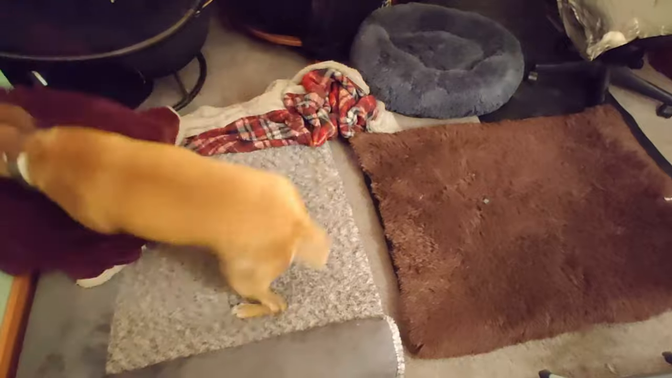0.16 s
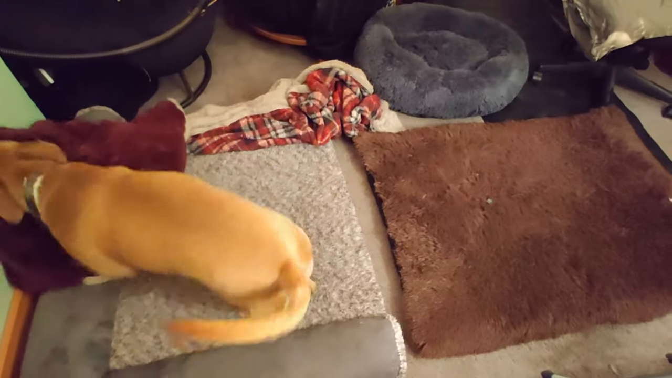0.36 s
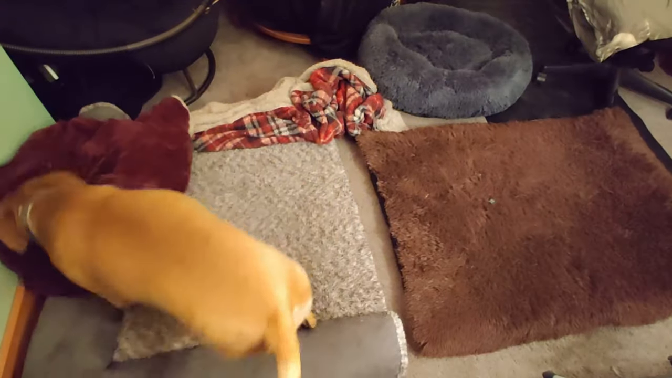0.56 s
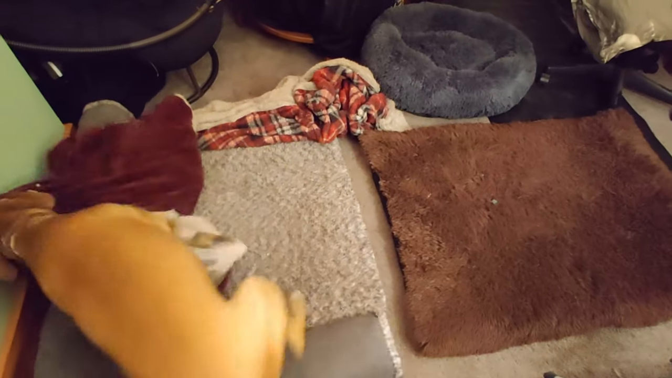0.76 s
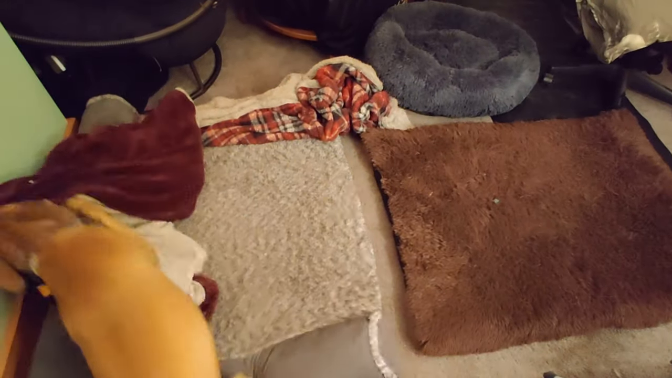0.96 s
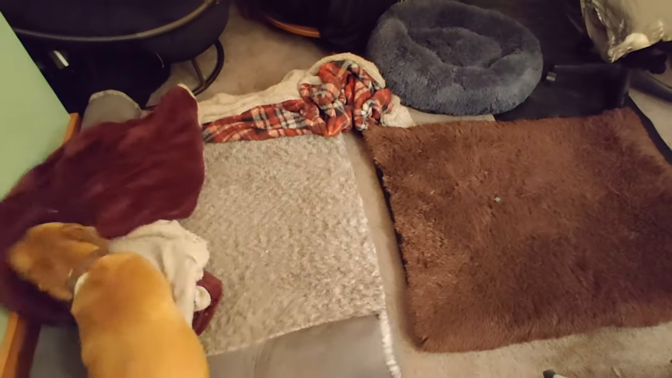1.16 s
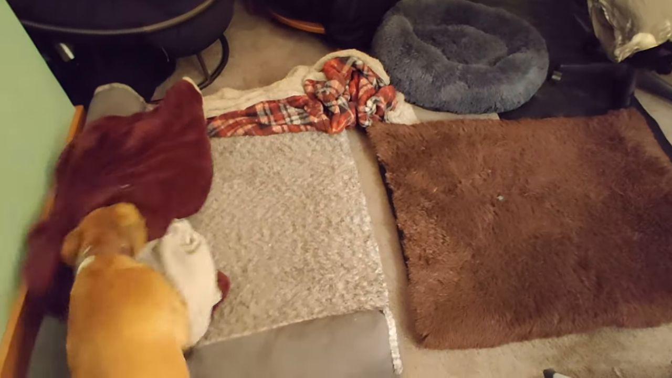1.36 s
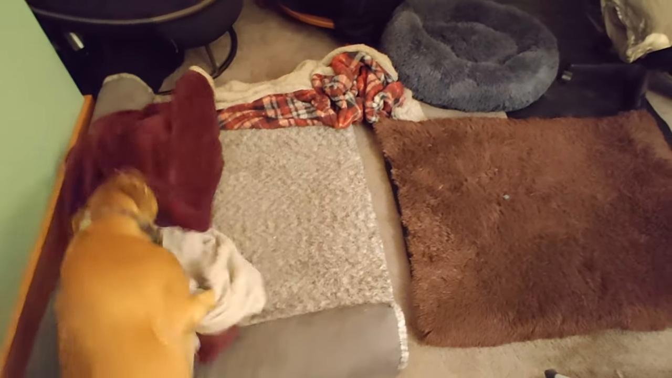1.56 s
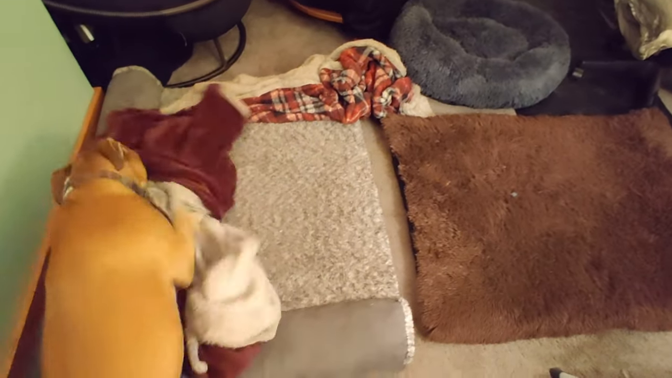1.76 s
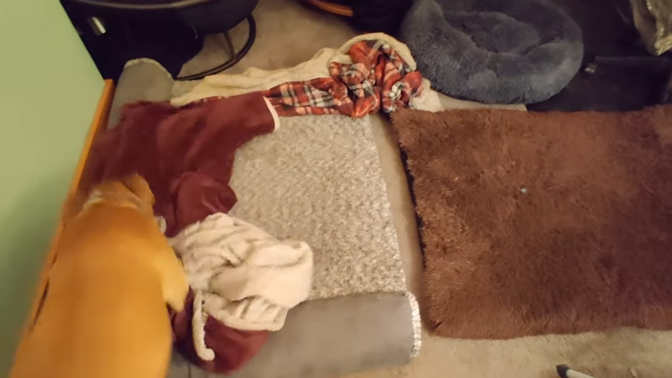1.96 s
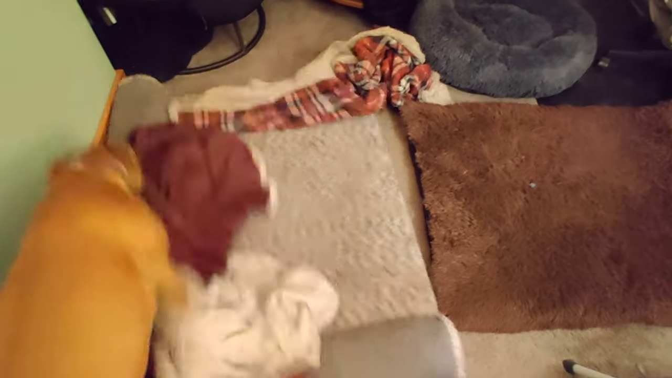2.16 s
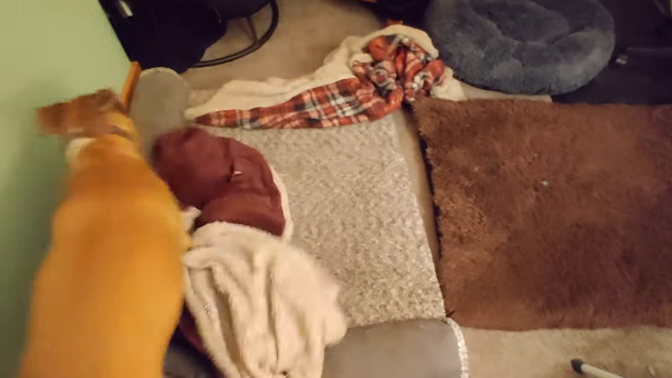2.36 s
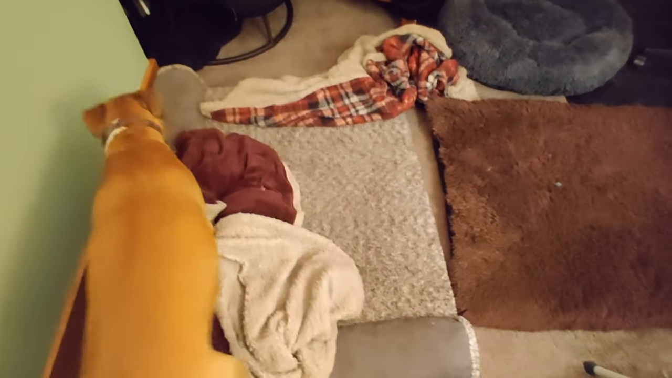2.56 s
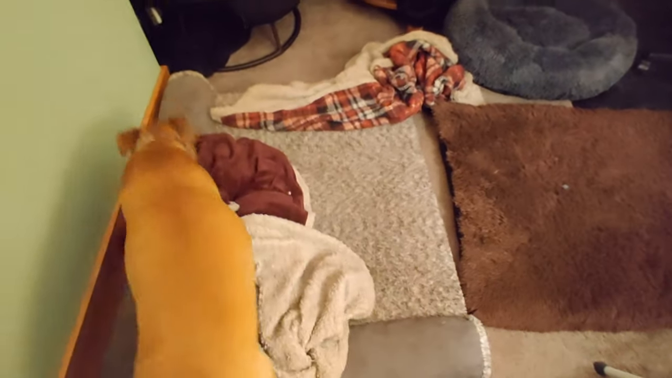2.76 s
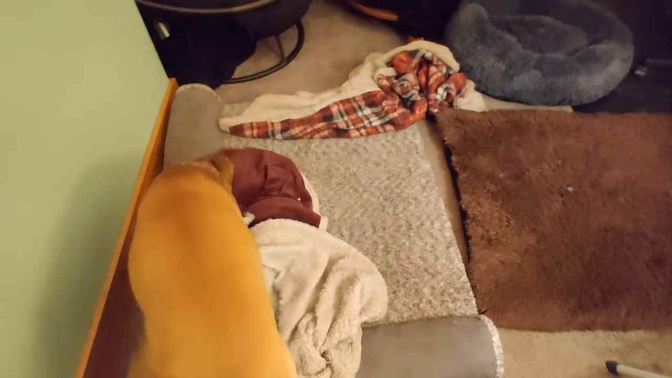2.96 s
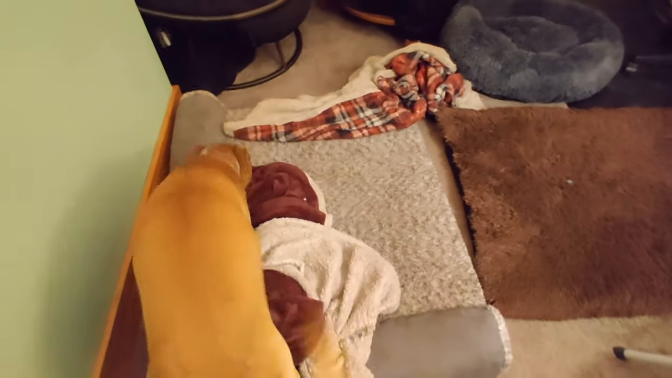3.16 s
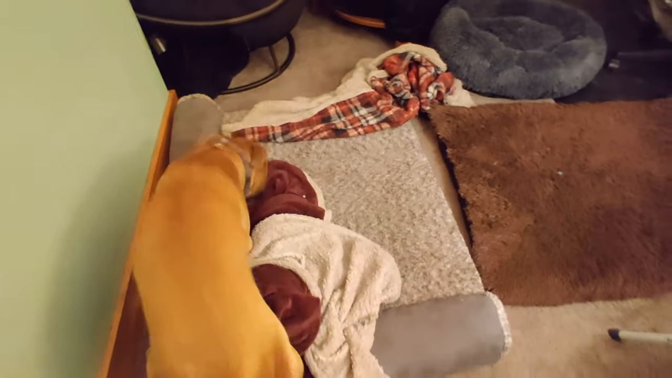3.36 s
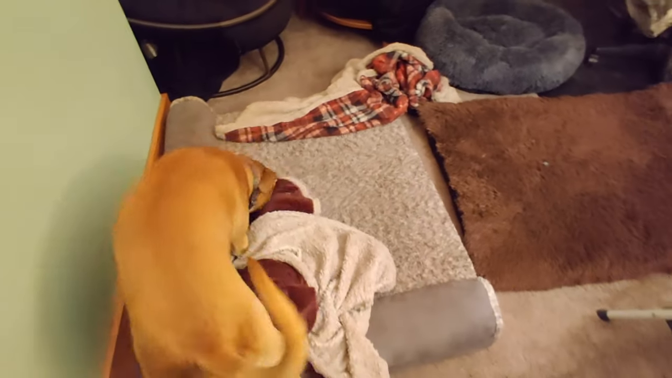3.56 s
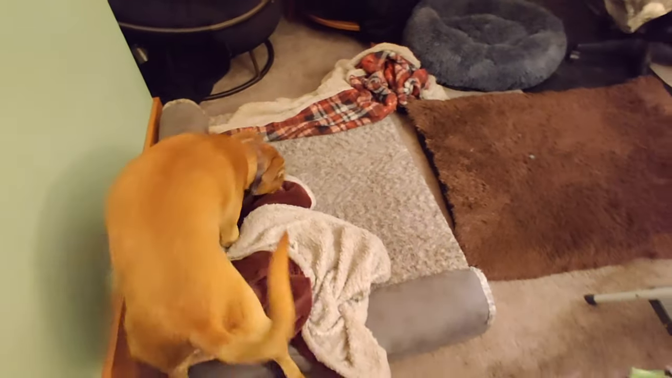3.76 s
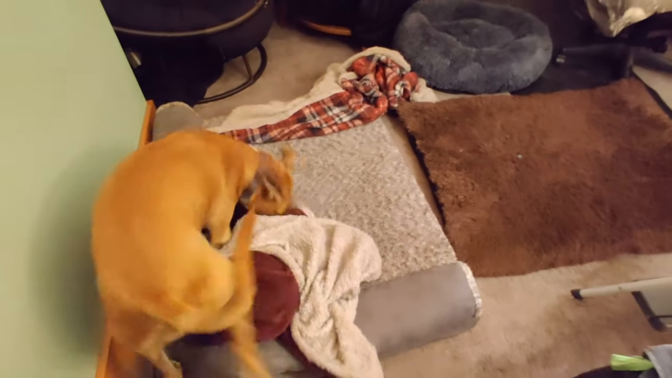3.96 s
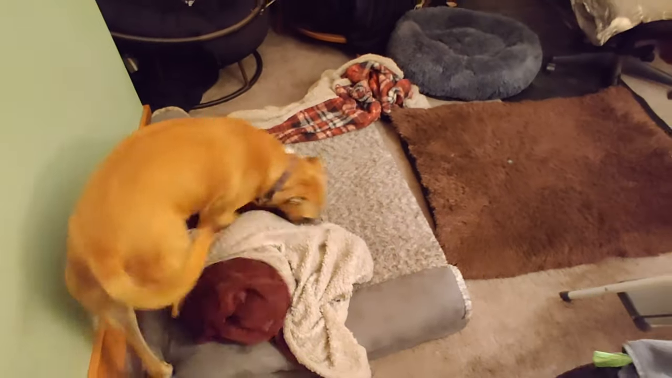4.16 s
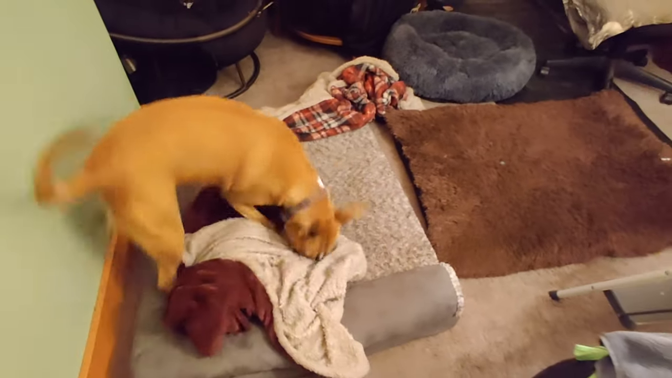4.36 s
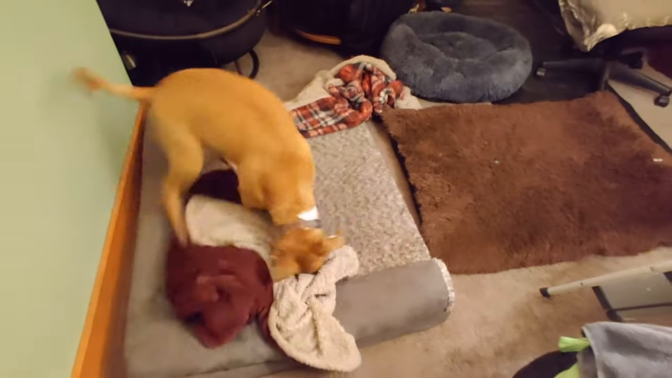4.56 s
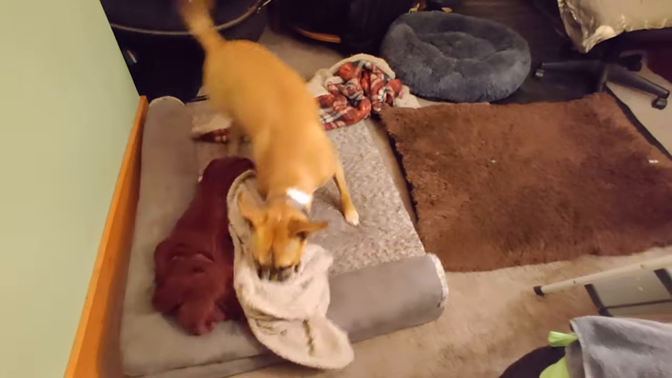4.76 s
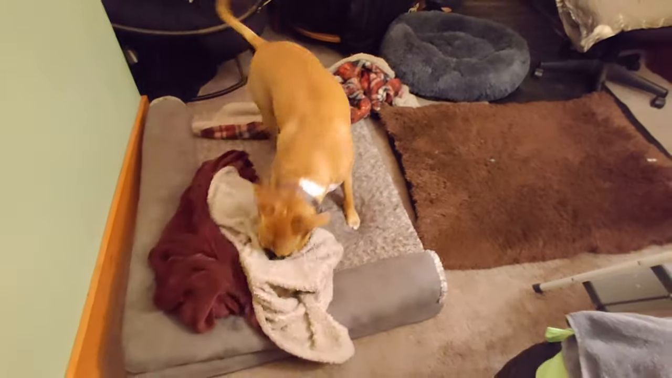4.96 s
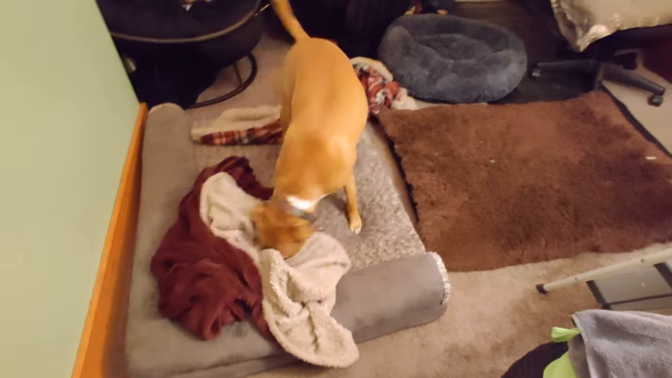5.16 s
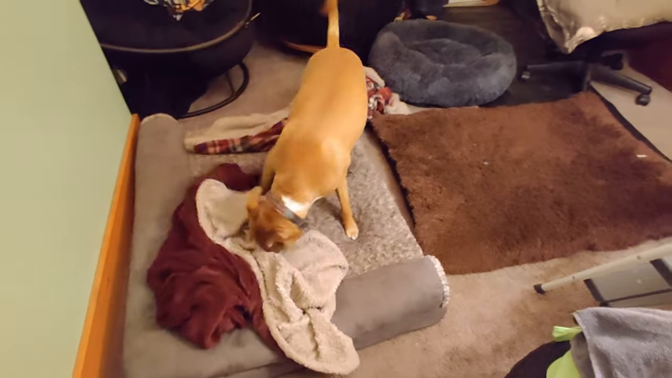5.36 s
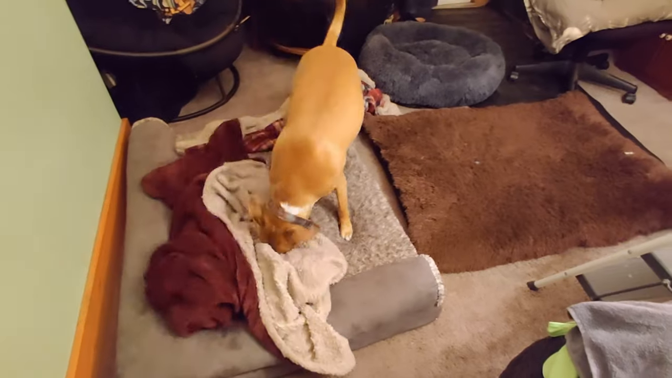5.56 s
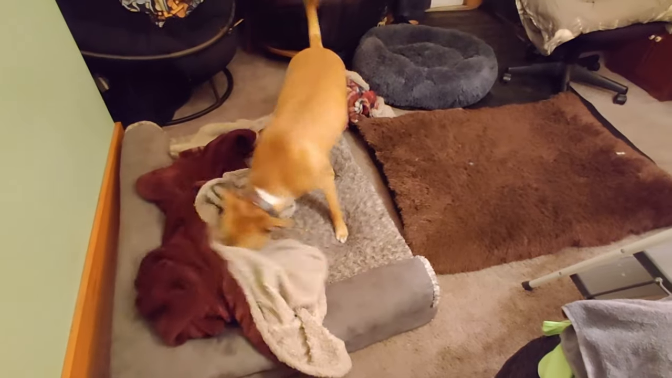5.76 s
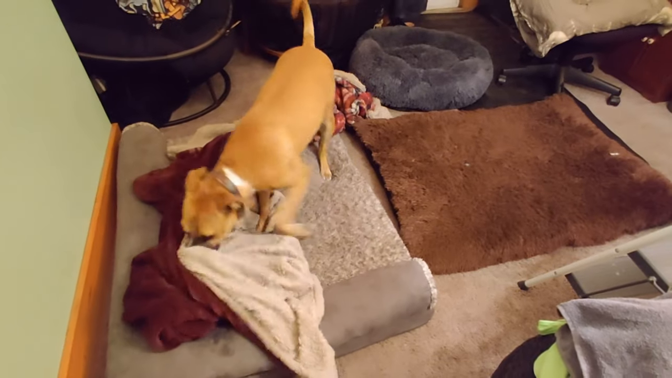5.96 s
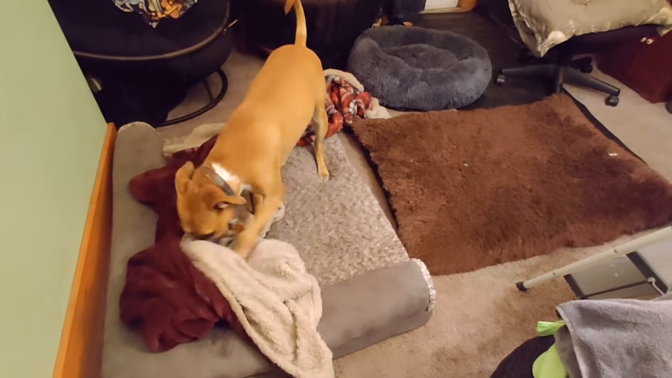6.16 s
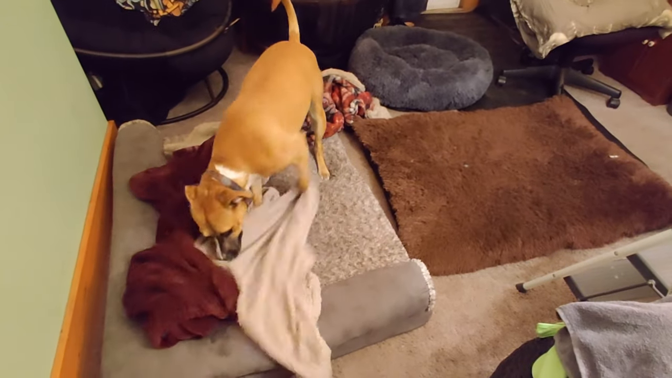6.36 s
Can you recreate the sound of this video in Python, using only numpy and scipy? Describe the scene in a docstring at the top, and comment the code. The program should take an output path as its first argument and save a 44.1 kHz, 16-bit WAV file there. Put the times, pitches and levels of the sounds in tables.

```python
"""Rustling, thuds and jingling tags: a dog roots through blankets on a cushion in a small carpeted room.
Coat and fleece rub and scuff amid short ticks, paws thud, and its body bumps a wooden rail by the wall.
Metal collar tags chatter and ring as it turns; once it snorts into the blanket.
Faint room air and mains hum lie below."""
import sys
import numpy as np
from scipy import signal
from scipy.fft import rfft, irfft, next_fast_len
from scipy.io import wavfile
from scipy.ndimage import uniform_filter1d

SR = 44100
rng = np.random.default_rng(int(sys.argv[2]) if len(sys.argv) > 2 else 0)


def store_wav(level_fs):
    """Save 16-bit WAV to argv[1]."""
    pcm = np.round(np.clip(np.atleast_2d(level_fs), -1, 1) * 32767)
    wavfile.write(sys.argv[1], SR, pcm.T.astype(np.int16))


N = 282365
TIME = np.arange(N) / SR


def rubbing(cloth, cushion_db=-3, lumpy_db=2.5, attack_s=0.0098, release_s=0.038):
    """Each shove rumbles the cushion under the dog's weight and swishes the fleece over it."""
    # (time [s], length [s], relative weight on cushion [dB], swish [dB])
    shoves = [(0.225, 0.13, -52.5, -62.5), (0.618, 0.024, -44.5, -54.5), (0.698, 0.1, -49.5, -57),
              (0.859, 0.02, -30, -42.5), (0.997, 0.11, -38.5, -48.5), (1.096, 0.069, -44.5, -44),
              (1.161, 0.018, -25, -39.5), (1.234, 0.11, -41, -49.5), (1.388, 0.0067, -25.5, -41),
              (1.462, 0.048, -52, -58.5), (1.564, .05, -54.5, -57), (1.860, 0.072, -55.5, -64),
              (1.997, 0.03, -41.5, -60), (2.058, 0.053, -38.5, -44), (2.132, 0.029, -31, -44),
              (2.26, 0.3, -53.5, -63.5), (2.764, 0.24, -52.5, -59.5), (2.971, 0.0756, -41, -54.5),
              (3.137, 0.33, -54, -59.5), (3.591, 0.059, -49, -57.5), (3.914, 0.031, -47, -56),
              (4.17, 0.31, -58.5, -61.5), (4.233, 0.085, -45, -59.5), (4.499, 0.064, -49.5, -60.5),
              (4.643, 0.16, -51.5, -62.5), (5.484, 0.033, -56, -55.5), (5.546, .18, -42, -61),
              (5.736, 0.082, -44.5, -56.5), (5.863, 0.063, -57, -65.5), (6.262, .11, -54.5, -75)]
    weight, swish = from_db(-59.5), from_db(-67)  # constant fidgeting
    for s, length_s, weight_db, swish_db in shoves:
        push = np.exp(-np.maximum(s - TIME, 0) / attack_s - np.maximum(TIME - s - length_s, 0) / release_s)
        weight = np.hypot(weight, from_db(weight_db) * push)
        swish = np.hypot(swish, from_db(swish_db) * push)
    # (frequency [Hz], relative density [dB])
    cushion_spectrum = [(45, 4), (75, -2), (115, -9), (158, 0.5), (215, -10), (290, -4.5), (430, -8),
                        (560, -13.5), (720, -18), (1100, -22.5), (1600, -36), (2500, -49)]
    rumble = rms_one(banded_noise(cushion_spectrum, flicker_db=2.5) * from_db(lumpy_db * drift(39)))
    return from_db(cushion_db) * weight * rumble + swish * cloth


def cloth_friction(grain_db=1.3):
    """Fibres stick and slip: grainy noise, rms 1."""
    # (frequency [Hz], relative density [dB])
    spectrum = [(350, -13), (600, -13), (780, -4), (1000, -4), (1450, -8.5), (1800, -6), (2400, -7),
                (3000, -9.5), (4100, -18), (4800, -15.5), (5300, -10.5), (6000, -31), (8000, -27.5),
                (16000, -39)]
    return rms_one(banded_noise(spectrum, flicker_db=3.0) * from_db(grain_db * drift(170)))


def swipes(spread=0.12):
    """Ribbed cloth slides over itself; the rasp's band follows the stroke speed."""
    # (centre [s], length [s], level [dB], start pitch [Hz], end pitch [Hz])
    strokes = [(1.136, 0.088, -43, 1087, 986), (1.284, 0.15, -46.5, 2735, 2004),
               (2.114, 0.16, -44, 2097, 2564), (3.926, .05, -58, 1043, 980), (4.209, .15, -53, 740, 553),
               (5.002, 0.037, -56, 737, 734)]
    out = np.zeros((2, N))
    for s, length_s, db, start_hz, end_hz in strokes:
        count = int(length_s * SR)
        phase = 2 * np.pi * np.cumsum(np.linspace(start_hz, end_hz, count)) / SR
        in_phase, quadrature = band(rng.standard_normal((2, 2, count)), 2.9, 80 + spread * start_hz)
        rasp = rms_one(in_phase * np.cos(phase) + quadrature * np.sin(phase))
        add(out, s - length_s / 2, from_db(db) * rasp * np.sqrt(np.hanning(count)) * pan(-0.68))
    return out


def rail_bumps(cloth, crack_hz=750, crack_t60_s=0.0021, t60_scale=0.92, rise_s=0.023, fall_s=0.016):
    """The coat scuffs along the rail, then the body lands: a crack and a hollow wooden boom."""
    # (time [s], crack [dB], boom [dB], scuff [dB]), levels before filtering
    hits = [(0.8590, -18.5, -22, -54), (1.1603, -7.5, -20, -28), (1.1718, -14.5, -18.5, -56),
            (1.391, -19.5, -59, -34), (1.399, -20.5, -26, -59)]
    # (frequency [Hz], relative level [dB], unscaled t60 [s])
    rail_modes = [(156.8, -1, 0.27), (217, -8, 0.12), (278.3, -0.5, 0.272), (329, 0.5, 0.21),
                  (375, 2, 0.11), (452, -11.5, 0.37), (566, -12.5, 0.19), (749, -24, 0.23),
                  (975, -12.5, 0.2), (1228, -5.5, 0.072), (1430, -25, 0.13), (1550, -17, 0.11),
                  (2150, -10, 0.082)]
    knocks, scuff, t = np.zeros(N), np.zeros(N), TIME[:SR // 2]
    for s, crack_db, boom_db, scuff_db in hits:
        boom = sum(from_db(db + rng.normal(0, 0.66)) * rng.choice([-1, 1]) * ring(t, hz, t60_s * t60_scale)
                   for hz, db, t60_s in rail_modes)
        crack = ring(t, crack_hz, crack_t60_s)
        add(knocks, s, from_db(crack_db) * peak_one(crack) + from_db(boom_db) * peak_one(boom))
        scuff += from_db(scuff_db) * np.exp(-np.maximum((s - TIME) / rise_s, (TIME - s) / fall_s))
    padded = band(knocks, 73, 2500)  # fur dulls the blow
    return room(padded, t60_s=0.37, wet_db=-11.5, likeness=0.74) * pan(1.7) + band(scuff * cloth, 180, 3500)


def thuds(cycles=1.4):
    """Paws and nearby fingers: a padded touch pushes the air for about one swing."""
    # (time [s], peak [dB], pitch [Hz], left minus right [dB])
    touches = [(0.619, -51, 171, -1), (1, -30, 121, 6), (1.744, -45, 298, -16), (1.765, -43, 238, -21.5),
               (2.139, -37, 70, 0), (2.151, -23, 58.4, -1), (2.447, -38, 269, -21.5),
               (2.528, -42, 303, -25), (2.953, -22, 430, -22.5), (3.167, -40, 135, 11.5),
               (3.206, -38, 208, 4), (3.5943, -34.5, 265, 6), (3.8012, -40, 390, 5), (3.929, -38.5, 150, 2),
               (4.178, -41, 333, 1), (4.275, -38.5, 161, 2), (4.537, -42.5, 163, 2), (4.753, -38, 138, 7),
               (5.022, -48, 218, -15), (6.258, -47, 166, 8), (6.337, -41.5, 222, 2.5)]
    out = np.zeros((2, N))
    for s, db, hz, side_db in touches:
        t = TIME[:int(3 * cycles * SR / hz)]
        push = ring(t, hz, 1.52 * cycles / hz) * t
        add(out, s, from_db(db) * peak_one(push) * pan(side_db))
    return room(out, t60_s=0.46, wet_db=-13.5, likeness=0.66)


def ticks(t60_s=0.0079, tone_share=0.4):
    """Short ticks: claws and seams catching, a faint tag click, a nearby finger tap."""
    # (time [s], level [dB], pitch [Hz])
    contacts = [(0.320, -45, 9000), (0.609, -47, 1200), (2.0468, -16.5, 2320), (2.367, -35, 2550),
                (2.781, -43.5, 9500), (2.9532, -22.5, 2350), (2.9735, -31, 1200), (3.920, -33, 1130),
                (4.169, -33, 2010)]
    out, t = np.zeros((2, N)), TIME[:SR // 20]
    for s, db, hz in contacts:
        grit = peak_one(band(rng.standard_normal((2, len(t))) * fade(t, t60_s), hz / 1.7, hz * 1.12))
        tick = tone_share * ring(t, hz, t60_s) + (1 - tone_share) * grit
        add(out, s, from_db(db) * tick * pan(-1))
    return room(out, t60_s=0.23, wet_db=-11, likeness=0.14)


def collar_tags(contacts_per_s=400, swell_s=0.0049, detune=0.00035, off_place_db=22):
    """Two tags chatter: strike place picks the modes; hard contact clicks and chokes the ring."""
    # (time [s], level [dB], hardness [0-1], strike place [0 centre, 1 rim], rattle decay [s])
    shakes = [(0.613, -55.5, .7, 0.52, 0.027), (0.684, -44.5, 0.5, 0.41, .008),
              (0.7033, -32.5, 0.67, 0.61, 0.015), (0.880, -35, 0.42, 0.44, 0.023),
              (0.912, -33, 0.38, 0.72, 0.014), (0.9235, -33.5, 0.79, 0.67, 0.0041),
              (1.004, -53, 0.97, .45, .008), (1.8433, -43, 0, .25, 0.014), (1.890, -43, 0.48, 0.43, 0.013),
              (2.365, -40.5, 0.9, 0.41, 0.0034), (2.867, -54, 0.76, 0.57, 0.054),
              (3.002, -43, 0.56, 0.72, .007), (3.025, -37.5, 0.79, .42, 0.0028),
              (3.217, -47, 0.57, .22, .03), (3.336, -34, 0.47, 0.6, 0.06), (3.35, -30, 0.54, 0.6, 0.013),
              (3.515, -34, .05, 0.68, 0.012), (3.608, -46, 0, 0.26, 0.034),
              (3.641, -39.5, 0.62, 0.55, .022), (4.031, -49.5, 0.46, 0.44, 0.093),
              (4.064, -42, 0.45, 0.81, 0.069), (4.109, -44, 0.47, 0.26, 0.018), (4.204, -54, .6, 0.48, 0.1),
              (4.331, -47, 0.7, 0.39, 0.043), (4.41, -46, 0.43, 0.47, 0.08),
              (4.446, -42, 0.68, 0.74, 0.024), (4.617, -57, .05, 0.4, .017),
              (4.694, -50.5, 0.2, 0.14, 0.047), (5.08, -55, .05, .05, 0.0081),
              (5.490, -36, 0.47, 0.6, 0.029), (5.499, -34, 0.67, 0.71, 0.025),
              (5.594, -46, 0.8, 0.49, 0.0093), (5.778, -49, 0.57, 0.55, 0.027),
              (5.9786, -41.5, 0.54, 0.44, 0.016), (5.998, -46.5, 0, 0.74, 0.045),
              (6.06, -54, .05, 1, 0.0072), (6.116, -49, 0.2, 0.91, 0.012), (6.321, -50, 0.68, 0.59, 0.013)]
    # (frequency [Hz], relative level [dB], free t60 [s], best strike place [0-1])
    modes = [(4912, -5.5, .32, 0), (5200, -20, .05, .4), (5900, -27, .06, .4), (7870, -5, .14, 1),
             (12190, -16.5, .14, .5), (13190, -26, .11, .5), (15620, -21, .08, .5)]
    out, t = np.zeros((2, N)), TIME[:SR // 3]
    next_shakes = [row[0] for row in shakes[1:]] + [TIME[-1]]
    for (s, db, hardness, place, decay_s), next_s in zip(shakes, next_shakes):
        contacts = (rng.random(len(t)) < contacts_per_s / SR) * rng.normal(0, 0.5, len(t))
        contacts *= np.exp(-t / decay_s) * (1 - np.exp(-t / swell_s))
        contacts[0] = 0.39 + 0.79 * hardness  # opening strike
        damping = fade(np.maximum(t + s - next_s, 0), t60_s=0.28)  # from the next shake on
        choked_db, click_db = -7 + 19.5 * hardness, -23 + 32 * hardness
        for hz, mode_db, t60_s, best_place in modes:
            free = sum(ring(t, hz * (1 + detune * rng.normal()), t60_s) for tag in range(2)) / 2
            choked = from_db(choked_db) * ring(t, hz * (1 + .011 * rng.normal()), t60_s=.06)
            tone = signal.fftconvolve(contacts, free + choked)[:len(t)] * damping
            tone /= np.sqrt(uniform_filter1d(tone ** 2, size=600).max())
            struck_db = db + mode_db - off_place_db * abs(place - best_place) + rng.normal(0, 2)
            # a swinging tag beams each mode a new way
            add(out, s, from_db(struck_db) * tone * pan(rng.normal(0, 1.9)))
        click = band(rng.standard_normal(len(t)) * fade(t, t60_s=0.0024), 2900, 12300)
        clicks = signal.fftconvolve(contacts, click)[:len(t)]
        add(out, s, from_db(db + click_db) * peak_one(clicks))
    reflected = room(out, t60_s=0.22, wet_db=0, likeness=0) - out
    return out * pan(15.3) + reflected * pan(6.5)  # right side shaded: mostly reflections


def snort(jitter=.13, air_share=0.32):
    """Lips and nostrils flap unevenly in a puff of air; the blanket absorbs the highs."""
    # (time [s], flutter rate [Hz], level [dB])
    puff = [(5.48, 155, -54), (5.525, 181, -40.5), (5.57, 150, -36), (5.61, 81, -39.5), (5.66, 73, -35),
            (5.70, 84, -34), (5.74, 99, -52), (5.80, 93, -61)]
    # (frequency [Hz], bandwidth [Hz], relative level [dB])
    muzzle_modes = [(82, 20, 5), (164, 29, 4), (319, 27, 2.5), (443, 17, -16)]
    times_s, rates_hz, levels_db = np.transpose(puff)
    rate_hz, db = np.interp(TIME, times_s, rates_hz), np.interp(TIME, times_s, levels_db)
    cycles = np.cumsum(rate_hz * np.exp(jitter * drift(39.86))) / SR
    flaps = np.diff(np.floor(cycles), prepend=0) * from_db(1.7 * drift(43))
    breath = air_share * rng.standard_normal(N) * np.sqrt(rate_hz / SR)
    t = TIME[:SR // 8]
    muzzle = sum((-1) ** k * from_db(mode_db) * width_hz
                 * np.sin(2 * np.pi * hz * t) * np.exp(-np.pi * width_hz * t)
                 for k, (hz, width_hz, mode_db) in enumerate(muzzle_modes))
    flutter = signal.fftconvolve(flaps + breath, muzzle)[:N]
    flutter /= np.sqrt(uniform_filter1d(flutter ** 2, size=1800) + 1e-9)
    envelope = from_db(db) * (TIME > times_s[0]) * (TIME < times_s[-1])
    return room(flutter * envelope, t60_s=0.083, wet_db=-9.5, likeness=0.78)


def room_tone(air_db=-52.5, hum_hz=59.1, hum_db=-54):
    """Quiet air and mains hum."""
    # (frequency [Hz], relative density [dB])
    air_spectrum = [(19, 0), (70, -2), (110, -11), (180, -10.5), (340, -41), (430, -21), (700, -29.5),
                    (1400, -33.5), (2200, -30), (4100, -42.5), (5300, -37), (6100, -49.5), (8000, -44),
                    (16000, -48.5)]
    hum = np.sqrt(2) * np.sin(2 * np.pi * hum_hz * TIME)
    return from_db(air_db) * banded_noise(air_spectrum, flicker_db=2.46) + from_db(hum_db) * hum


def room(x, t60_s, wet_db, likeness):
    """Direct sound plus dense, short reflections; likeness is their left-right correlation."""
    t = TIME[:SR // 3]
    shared, *own = rng.standard_normal((3, len(t))) * fade(t, t60_s) * (t > .002)
    tails = np.sqrt(likeness) * shared + np.sqrt(1 - likeness) * np.array(own)
    tails /= np.sqrt(np.sum(tails ** 2, axis=1, keepdims=True))
    return x + from_db(wet_db) * signal.fftconvolve(np.atleast_2d(x), tails, axes=1)[:, :N]


def banded_noise(spectrum, flicker_db):
    """Stereo noise in overlapping half-octave bands, each flickering on its own; rms 1."""
    # (frequency [Hz], left-right correlation [-1 to 1])
    likeness = [(60, 0.88), (250, 0.9), (500, .6), (1000, 0), (2200, -0.19), (5000, 0), (15000, 0)]
    # (frequency [Hz], left minus right [dB])
    balance = [(60, 0.5), (700, 2), (1300, -2.5), (2400, -6), (4400, 7), (15000, -0.5)]
    size = next_fast_len(N, real=True)
    hz = np.maximum(np.arange(size // 2 + 1) * SR / size, 1)
    mid, side = rfft(rng.standard_normal((2, size)))
    alike = at_hz(likeness, hz)
    stereo = np.sqrt(1 + alike) * mid + np.sqrt(1 - alike) * side * [[1], [-1]]
    stereo *= from_db(at_hz(spectrum, hz) + at_hz(balance, hz) * [[1], [-1]] / 2)
    low_hz, high_hz = spectrum[0][0], spectrum[-1][0]
    half_octaves = 2 * np.log2(hz / low_hz)
    out = np.zeros((2, N))
    for k in range(int(2 * np.log2(high_hz / low_hz)) + 2):
        triangle = np.maximum(1 - np.abs(half_octaves - k), 0)
        out += irfft(stereo * triangle, size)[:, :N] * from_db(flicker_db * drift(7.8))
    return rms_one(out)


def drift(corner_hz):
    """Smooth random wander, rms about 1."""
    step, settle = 40, 2000
    pole = np.exp(-2 * np.pi * corner_hz * step / SR)
    noise = rng.standard_normal(N // step + settle + 2)
    slow = signal.lfilter([1], [1, -2 * pole, pole * pole], noise)[settle:]
    return np.interp(np.arange(N) / step, np.arange(len(slow)), rms_one(slow))


def from_db(db):
    return 10 ** (np.asarray(db) / 20)


def rms_one(x):
    return x / np.sqrt(np.mean(x ** 2) + 1e-20)


def peak_one(x):
    return x / np.abs(x).max()


def at_hz(points, hz):
    points_hz, values = np.transpose(points)
    return np.interp(np.log(hz), np.log(points_hz), values)


def pan(left_minus_right_db):
    return from_db(np.array([[.5], [-.5]]) * left_minus_right_db)


def add(out, start_s, sound):
    i = round(start_s * SR)
    out[..., i:i + sound.shape[-1]] += sound[..., :N - i]


def band(x, low_hz, high_hz):
    return signal.sosfilt(signal.butter(2, [low_hz, high_hz], "band", fs=SR, output="sos"), x)


def fade(t, t60_s):
    return np.exp(-np.log(1000) * t / t60_s)


def ring(t, hz, t60_s):
    return np.sin(2 * np.pi * hz * t) * fade(t, t60_s)


def scene():
    """The dog on its bedding, over the room tone."""
    cloth = cloth_friction()
    background = room_tone()
    bedding = rubbing(cloth) + swipes()
    return bedding + rail_bumps(cloth) + thuds() + ticks() + collar_tags() + snort() + background


def record(dry):
    """Steep low-pass at 15.9 kHz."""
    return signal.sosfilt(signal.ellip(10, .2, 70, 15900, fs=SR, output="sos"), dry)


dry = scene()
out = record(dry)
store_wav(out)
```